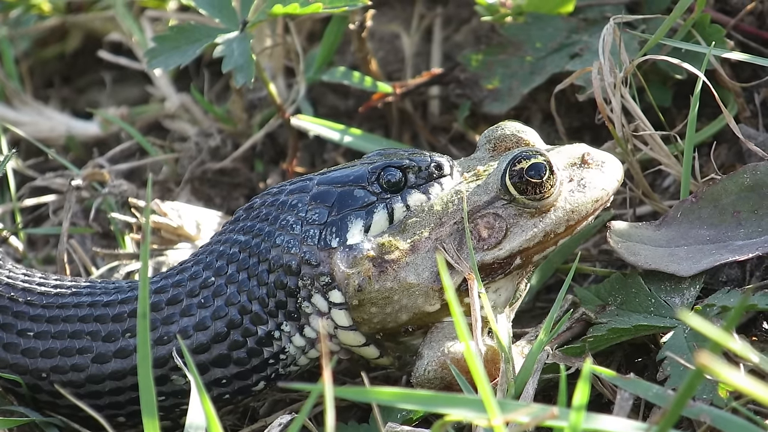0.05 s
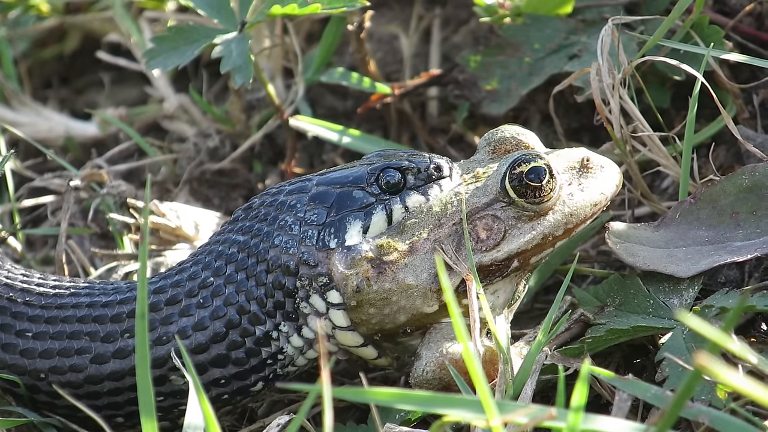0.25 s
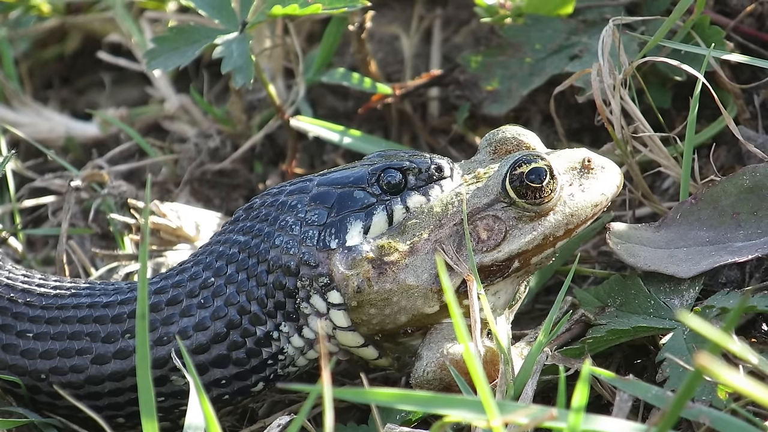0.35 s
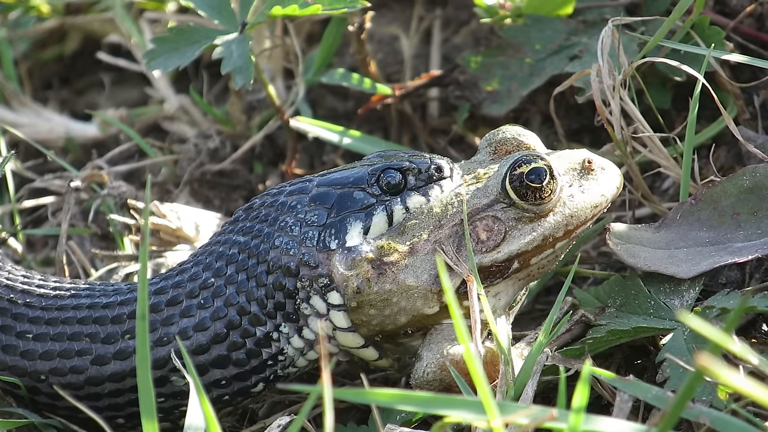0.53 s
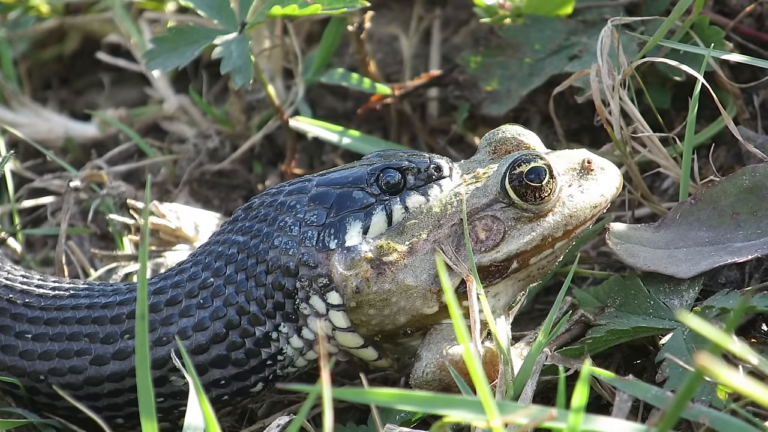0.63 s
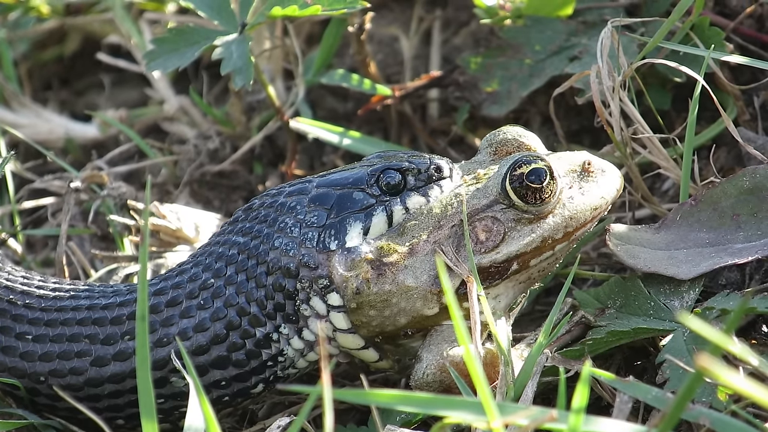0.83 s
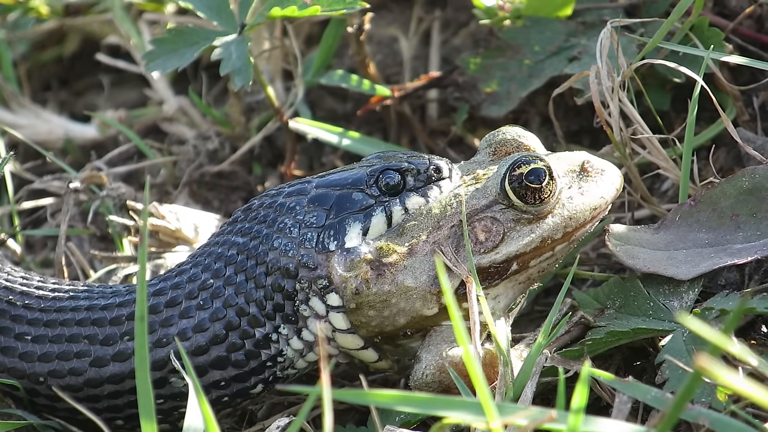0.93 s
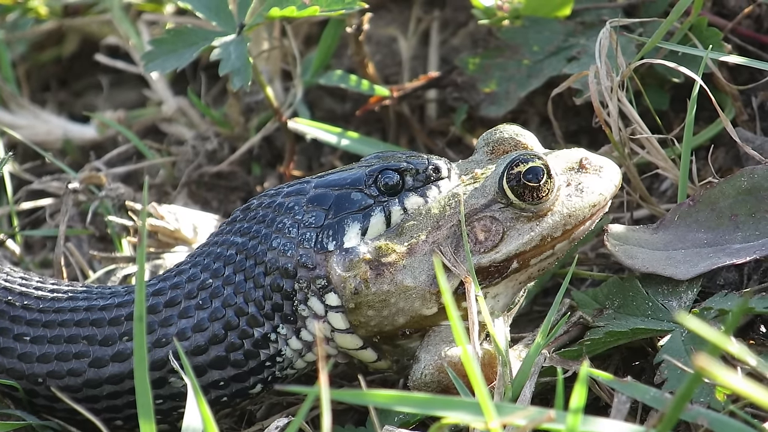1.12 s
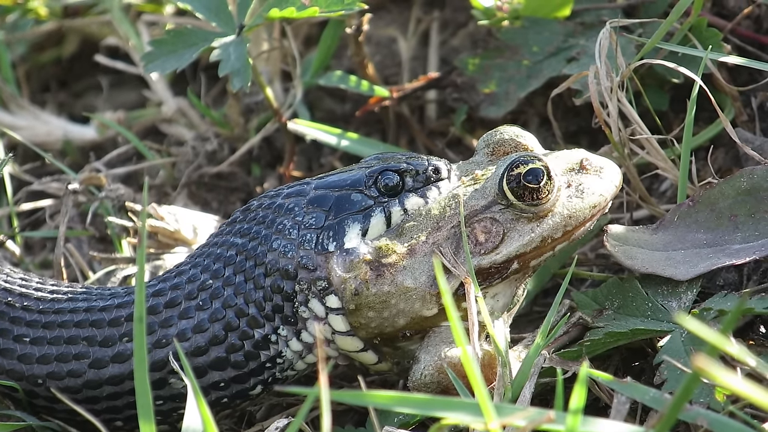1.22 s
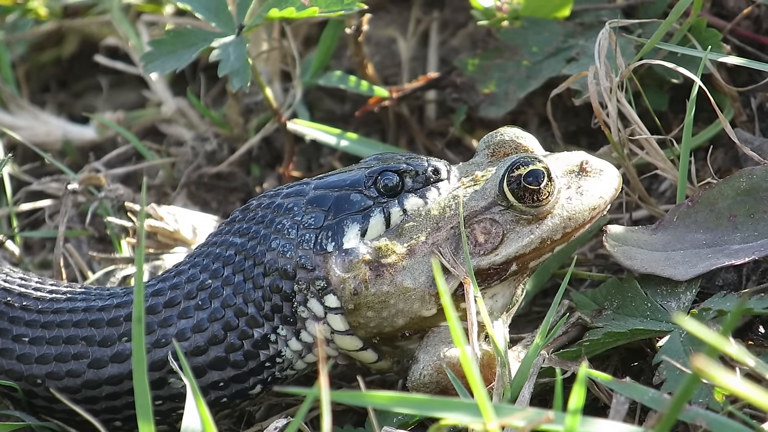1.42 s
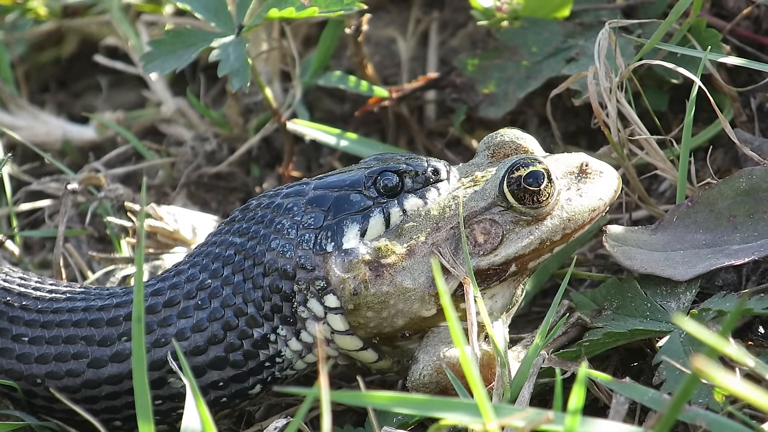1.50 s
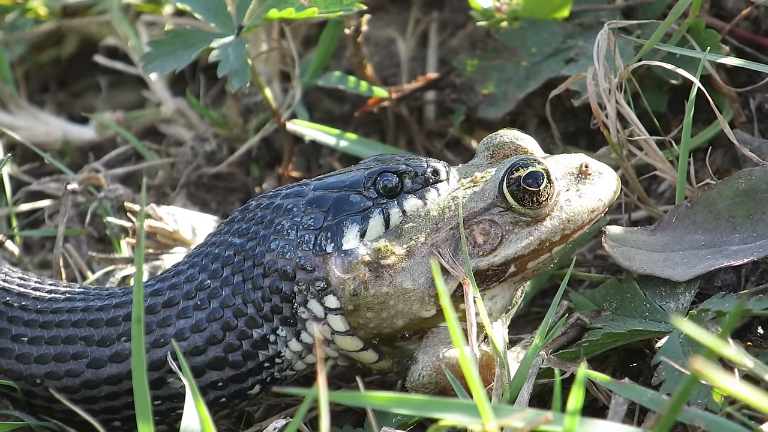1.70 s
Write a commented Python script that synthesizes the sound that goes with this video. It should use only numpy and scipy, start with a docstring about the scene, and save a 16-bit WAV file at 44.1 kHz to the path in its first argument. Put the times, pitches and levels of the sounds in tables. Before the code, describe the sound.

Light wind flutters on the microphone over an even hush of air and foliage. Leaves rub faintly around 0.3 seconds. The stronger gust arrives near 0.5 seconds with low, soft thumps and another faint rustle, easing by 0.9. At about 1.1 seconds leaves brush again and a dry stem ticks once. A weaker gust bumps the microphone from 1.25 to 1.5 seconds, then fades.

```python
"""An even hush of air and foliage, with a faint low flutter of wind, close to the ground at a grassy spot.
Two small gusts brush the microphone: the flutter swells and single eddies thump on its ports.
Nearby leaves rub together faintly, and a dry stem ticks once between the gusts."""
import sys
import numpy as np
from scipy.fft import rfft, irfft, next_fast_len
from scipy.io import wavfile
from scipy.ndimage import uniform_filter1d, map_coordinates

SR = 44100
rng = np.random.default_rng(int(sys.argv[2]) if len(sys.argv) > 2 else 0)


def wav_out(sig):
    """Save sig, one row per channel (or a flat mono array), as 16-bit PCM at SR to the path in sys.argv[1]."""
    wavfile.write(sys.argv[1], SR, np.round(np.clip(np.atleast_2d(sig).T, -1, 1) * 32767).astype(np.int16))


N = 77175


def amp(db):
    """Decibels to gain."""
    return 10 ** (np.asarray(db) / 20)


def unit(x):
    """Scale to rms 1."""
    return x / np.sqrt(np.mean(x ** 2) + 1e-20)


def curve(points):
    """Function of frequency through (frequency [Hz], value) points, on a log axis."""
    knots_hz, values = np.transpose(points)
    return lambda hz: np.interp(np.log(hz + 1), np.log(knots_hz + 1), values)


def wobble(rate_hz):
    """Smooth random curve, rate_hz knots a second."""
    knots = rng.standard_normal(int(N * rate_hz / SR) + 4)
    return map_coordinates(knots, [np.arange(N) * rate_hz / SR])


def filtered(x, response):
    """Apply a frequency response to x."""
    size = next_fast_len(N + SR // 2)
    hz = np.fft.rfftfreq(size, 1 / SR)
    return irfft(rfft(x, size) * response(hz), size)[..., :N]


def noise(spectrum_db, coherence):
    """Stereo noise of rms 1; spectrum and left-right coherence are functions of frequency."""
    def mid_side_gains(hz):
        angle = np.arccos(np.clip(coherence(hz), -1, 1)) / 2 * np.ones_like(hz)
        return amp(spectrum_db(hz)) * [np.cos(angle), np.sin(angle)]

    mid, side = filtered(rng.standard_normal((2, N)), mid_side_gains)
    return unit(np.array([mid + side, mid - side]))


# hush spectrum (frequency [Hz], relative density [dB])
HUSH_SPECTRUM = [(20, -26), (100, -6), (250, 0.2), (420, -0.84), (700, -5), (1200, -10), (2200, -14.5),
                 (4500, -18), (8000, -23), (12500, -26), (14200, -28.5), (15700, -35.5)]
# hush stereo image (frequency [Hz], left-right coherence [-1..1])
HUSH_COHERENCE = [(100, 1), (250, -0.11), (450, -0.44), (750, -0.34), (1300, 0.021), (2400, .4),
                  (4500, 0.52), (8000, 0.34), (14000, 0.14)]


def hush(t, level_db=-42.5, ease_db_per_s=0.33):
    """Air and distant foliage: nearly even noise that eases as the air calms."""
    bed = noise(curve(HUSH_SPECTRUM), curve(HUSH_COHERENCE))
    drift_db = .15 * wobble(rate_hz=7.1) - ease_db_per_s * (t - t.mean())
    return bed * amp(level_db + drift_db)


# wind strength at the microphone (time [s], level [dB])
WIND_LEVEL = [(0, -49.5), (.13, -61), (.2, -45), (.32, -50.5), (.43, -52.5), (.478, -27.5), (.52, -37),
              (.555, -30), (.61, -33), (.67, -39), (.725, -42.5), (.81, -39), (.86, -43.5), (.95, -43),
              (1.19, -49), (1.25, -45), (1.285, -42.5), (1.335, -35), (1.42, -38.5), (1.47, -43),
              (1.52, -47), (1.75, -60)]
# flutter spectrum (frequency [Hz], relative density [dB])
FLUTTER_SPECTRUM = [(20, -9), (40, -10), (70, -0.5), (110, 2), (170, -6), (240, -10.5), (350, -21),
                    (700, -33), (2000, -80)]
# flutter stereo image (frequency [Hz], left-right coherence [-1..1])
FLUTTER_COHERENCE = [(40, .97), (100, 0.92), (200, 0.68), (400, -0.65)]


def flutter(t):
    """Small turbulence at the microphone ports follows the strength of the wind."""
    air = noise(curve(FLUTTER_SPECTRUM), curve(FLUTTER_COHERENCE))
    local_power = uniform_filter1d(np.mean(air ** 2, axis=0), size=1500)
    steady_air = air / np.sqrt(np.abs(local_power) + 1e-9)
    wind_db = np.interp(t, *np.transpose(WIND_LEVEL))
    return steady_air * amp(wind_db)


# eddy strikes (time [s], peak [dB], pitch [Hz], left minus right [dB], right port lag [ms])
EDDY_STRIKES = [(0.164, -37, 60, -2, 1), (0.2022, -31.5, 66.4, 1, .3), (0.4204, -30.5, 114, 2.5, 0.3),
                (0.4602, -28.5, 97, -6, 0.5), (.484, -24, 122, -6, -1.4), (0.5432, -16, 139, -1, -2.5),
                (0.5629, -12.5, 134.5, -0.2, 1.5), (0.6572, -21, 101, -4, 1.5), (0.7, -27.5, 172, 2, 1),
                (.766, -21.5, 123, 3.5, 1.6), (0.809, -31, 96, -9, 0.5), (1.245, -31, 89, -2, 0.6),
                (1.26, -32.5, 75.6, -1, -1), (1.3957, -23.5, 133, 2, -.4), (1.491, -24.5, 101, 3, 0.5)]


def eddies(t, sigma_cycles=0.38, core_db=-13.5, core_pitch_ratio=2.05):
    """Each eddy crosses the two ports as one brief dip and rebound of pressure, with a sharper core."""
    def swirl(cycles):
        return unit(np.sin(2 * np.pi * cycles) * np.exp(-.5 * (cycles / sigma_cycles) ** 2))

    out = np.zeros((2, N))
    sides = np.array([[.5], [-.5]])
    for time_s, peak_db, pitch_hz, pan_db, lag_ms in EDDY_STRIKES:
        cycles = pitch_hz * (t - time_s + sides * lag_ms / 1000)
        thump = swirl(cycles) + amp(core_db) * swirl(core_pitch_ratio * cycles)
        out += amp(peak_db + sides * pan_db) * thump / np.abs(thump).max()
    return out


# leaf rustles (crest time [s], Gaussian sigma [s], level [dB], band centre [Hz])
LEAF_RUSTLES = [(0.257, 0.0081, -53, 11100), (.286, .007, -55, 11500), (0.296, 0.014, -53.5, 3600),
                (.33, .015, -63, 11600), (0.533, 0.036, -49, 5060), (.535, .036, -59.5, 11200),
                (1.075, 0.033, -55, 4700), (1.12, 0.043, -59, 11500)]


def leaves(t, half_width_hz=2700, grain_db=2.5, coherence=.4):
    """Leaves brush together: short grainy swells of friction, each in its own band."""
    out = np.zeros((2, N))
    for crest_s, sigma_s, level_db, centre_hz in LEAF_RUSTLES:
        band_db = lambda hz: -20 * np.log10(1 + ((hz - centre_hz) / half_width_hz) ** 2)
        rub = noise(band_db, lambda hz: coherence)
        grain = amp(grain_db * wobble(rate_hz=500))
        swell = np.exp(-.5 * ((t - crest_s) / sigma_s) ** 2)
        out += unit(rub * grain) * amp(level_db) * swell
    return out


# stem tick spectrum (frequency [Hz], relative density [dB])
STEM_SPECTRUM = [(800, -30), (2200, -12), (3200, 3), (5200, 1), (8000, -12), (15000, -17)]


def stem(t, onset_s=1.1015, level_db=-37.5, t60_s=0.017, coherence=.4):
    """A dry stem ticks once: bright noise with a sudden start and a fast decay."""
    crack = noise(curve(STEM_SPECTRUM), lambda hz: coherence)
    decay = (t >= onset_s) * np.exp(-np.log(1000) * np.abs(t - onset_s) / t60_s)
    return crack * amp(level_db) * decay


def scene():
    """Wind on the microphone in front of quiet vegetation."""
    t = np.arange(N) / SR
    wind = flutter(t) + eddies(t)
    return wind + hush(t) + leaves(t) + stem(t)


def record(dry):
    """Brick-wall low-pass."""
    cutoff_hz = 15768
    return filtered(dry, lambda hz: hz < cutoff_hz)


dry = scene()
out = record(dry)
wav_out(out)
```